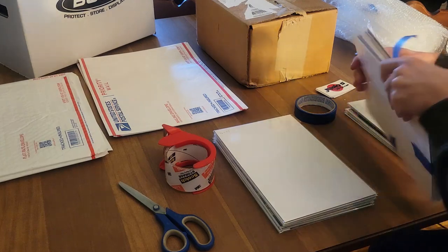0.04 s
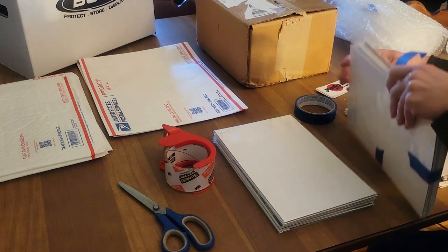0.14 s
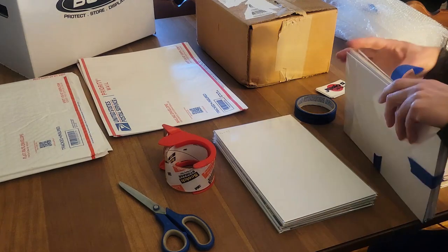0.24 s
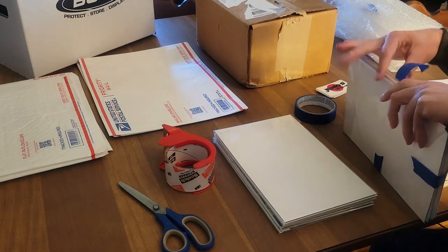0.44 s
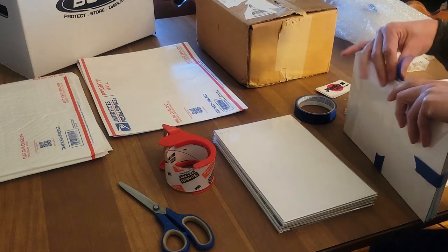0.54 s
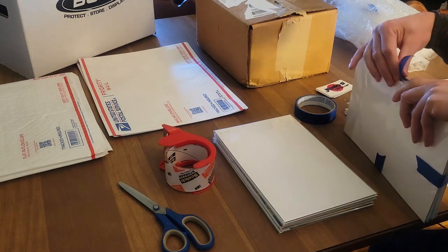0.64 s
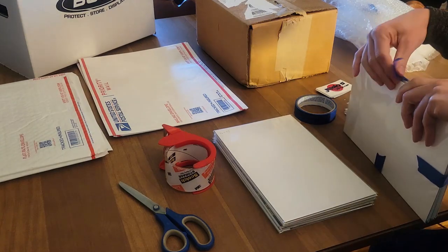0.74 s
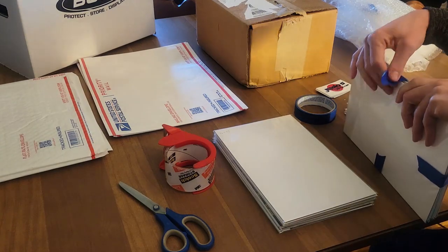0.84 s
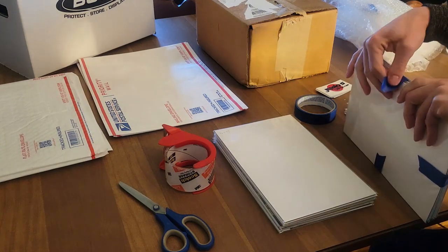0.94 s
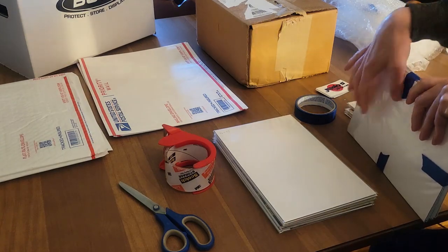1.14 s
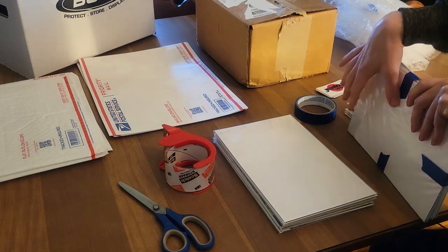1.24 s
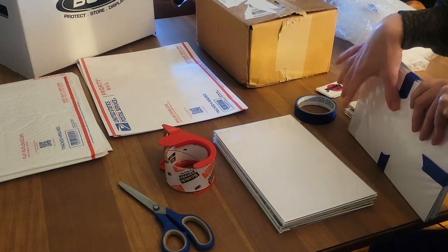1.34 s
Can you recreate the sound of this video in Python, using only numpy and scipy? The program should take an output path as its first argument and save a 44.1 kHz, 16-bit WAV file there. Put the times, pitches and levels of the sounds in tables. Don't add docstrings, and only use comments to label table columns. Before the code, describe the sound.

A stack of taped card is knocked edge-down on a wooden table: papery snap, woody boom, a light bounce. Then faint finger rubs, tiny tape ticks and a short palm drag, close stereo microphone, small live room.

```python
import sys
import numpy as np
from scipy import signal
from scipy.fft import rfft, irfft, next_fast_len
from scipy.io import wavfile
from scipy.ndimage import uniform_filter1d

SR = 44100
rng = np.random.default_rng(int(sys.argv[2]) if len(sys.argv) > 2 else 0)


def gain_from_decibels(decibels):
    exponent = np.asarray(decibels, float) / 20
    return 10 ** exponent


def persist_wave(psi):
    counts = np.round(np.clip(psi, -1, 1) * 32767).astype(np.int16)
    wavfile.write(sys.argv[1], SR, np.atleast_2d(counts).T)


N = 61739
SLAP_S = .2485


def evened(x):
    return x / np.sqrt(np.mean(x ** 2) + 1e-20)


def read(points, hz):
    f, value = np.transpose(points)
    return np.interp(np.log(hz + 1), np.log(f + 1), value)


def colour(x, points, lag_s=0.):
    size = next_fast_len(x.shape[-1] + 4096)
    hz = np.fft.rfftfreq(size, 1 / SR)
    response = gain_from_decibels(read(points, hz)) * np.exp(-2j * np.pi * hz * lag_s)
    return irfft(rfft(x, size) * response, size)[..., :N]


def ring(start_s, hz, db, t60_s, rise_s):
    t = np.maximum(np.arange(N) / SR - start_s, 0)
    envelope = gain_from_decibels(db - 60 * t / t60_s) * (1 - np.exp(-t / rise_s))
    return envelope * np.sin(2 * np.pi * hz * t)


def heard(x, loose):
    # pitch_hz, level_db
    lean = [(60, 8), (300, -1), (1200, 2.5), (4000, 1.5), (8000, 10), (15000, 3)]
    half = np.array(lean) * [1, .5]
    left, right = x[0] * np.sqrt(1 - loose ** 2) + loose * x[1:]
    return np.array([colour(left, half, lag_s=0.0001404), colour(right, half * [1, -1])])


def slap():
    # start_s, level_db, bright pitch_hz
    contacts = [
        (.2442, -34, 3000),
        (.2463, -22, 2200),
        (.2477, -22, 4600),
        (.2484, -16, 5200),
        (.2502, -22, 4500),
        (.2514, -21, 5500),
        (.2528, -28, 6000),
    ]
    # pitch_hz, level_db per Hz
    paper_spectrum = [(470, -9), (800, -6), (2600, -11.5), (4160, -3.5), (6110, -10.5), (6670, -24.5),
                      (8550, -10.5), (15500, -17.5)]
    slap_db, rise_s, fall_s = -23, .0014, .0028
    air_db, air_rise_s = -15, .0054
    t = np.arange(N) / SR - SLAP_S
    puff = np.exp(np.where(t < 0, t / rise_s, -t / fall_s))
    puff = puff + gain_from_decibels(air_db) * (t < 0) * np.exp(np.minimum(t, 0) / air_rise_s)
    out = gain_from_decibels(slap_db) * puff * evened(colour(rng.standard_normal((3, N)), paper_spectrum))
    for start_s, db, hz in contacts:
        out += ring(start_s, hz, db, .0025, .00005)
        out += ring(start_s, 2.3 * hz, db - 4, .0012, .00003)
    return out


def tabletop():
    # start_s, force_db
    blows = [
        (.2455, 1.5),
        (0.2528, 2),
        (.2575, -23),
        (0.264, -2.5),
        (.3240, -3),
    ]
    # pitch_hz, level_db
    top_modes = [(88, -57), (110, -26), (134, -25.5), (190, -35.5), (281, -32.5), (328, -39.5), (400, -42),
                 (510, -36.5), (590, -36), (670, -34.5), (740, -34), (860, -38), (965, -37), (1150, -39.5)]
    # start_s, pitch_hz, level_db, t60_s
    bounce = [
        (.3245, 816, -24.5, 0.013),
        (.3245, 484, -27, 0.033),
        (.3245, 1300, -41, 0.026),
    ]
    rattle_db, rattle_per_s, rattle_end_s, rattle_fade_db_per_s = -9, 400, .385, -91
    ring_cycles, ring_max_s = 52, .2
    blow_s, force_db = np.transpose(blows)
    t = np.arange(N) / SR
    after = t - blow_s[0]
    rattle = (after > 0) * (t < rattle_end_s) * gain_from_decibels(rattle_db + rattle_fade_db_per_s * after)
    rattle = rattle * (rng.random(N) < rattle_per_s / SR)
    out = sum(ring(start_s, hz, db, t60_s, .0003) for start_s, hz, db, t60_s in bounce)
    for hz, db in top_modes:
        push = rattle * rng.standard_normal(N)
        sign = rng.choice([-1, 1], len(blows))
        sign[-1] = 1
        push[np.round(blow_s * SR).astype(int)] = gain_from_decibels(force_db) * sign
        mode = ring(0, hz, db, min(ring_cycles / hz, ring_max_s), (24 / hz) ** 2)
        out += signal.fftconvolve(push, mode[:SR // 2])[:N]
    return out


def frame_sway():
    # pitch_hz, level_db, swell_s
    sway_modes = [
        (52, 0, .044),
        (104, -12, .045),
        (134, -13, .045),
        (39, -15, .13),
    ]
    sway_start_s = [
        .2475,
        .3262,
    ]
    sway_level_db = [
        -23.5,
        -27,
    ]
    sway_pace = [
        1,
        .85,
    ]
    out = np.zeros(N)
    for start_s, sway_db, pace in zip(sway_start_s, sway_level_db, sway_pace):
        since = np.arange(N) / SR - start_s
        for hz, db, swell_s in sway_modes:
            u = np.maximum(since, 0) / (swell_s * pace)
            swell = (u * np.exp(1 - u)) ** 5
            out += gain_from_decibels(sway_db + db) * swell * np.sin(2 * np.pi * hz * since)
    return out


def rub(stroke, body, per_s, spread_db, flutter_db):
    t, level_db = np.arange(N) / SR, np.transpose(stroke)
    strength = gain_from_decibels(spread_db * np.minimum(rng.exponential(1, (3, N)), 5))
    strength = strength * (rng.random((3, N)) < per_s / SR)
    grain = strength * rng.standard_normal((3, N))
    hiss = 0.64 * rng.standard_normal((3, N))
    slips = evened(colour(grain + hiss, body))
    flutter = evened(uniform_filter1d(rng.standard_normal(N), size=400))
    return slips * gain_from_decibels(np.interp(t, *level_db, left=-110) + flutter_db * flutter)


def finger():
    # start_s, level_db
    finger_stroke = [(0, -70), (.05, -82), (.128, -65), (.21, -76), (.40, -60.5), (.50, -78), (.585, -65),
                     (.63, -53), (.72, -73), (.765, -69), (.83, -73), (.88, -68), (1.0, -81.5),
                     (1.052, -68.5), (1.058, -62), (1.09, -54.5), (1.14, -57.5), (1.4, -73)]
    # pitch_hz, level_db per Hz
    skin_spectrum = [(500, -21), (1500, -6), (2700, -8.5), (3600, -1), (5200, -5), (7000, -6),
                     (12500, -3.5), (15800, -10)]
    return rub(finger_stroke, skin_spectrum, per_s=2000, spread_db=1.0, flutter_db=1.7)


def palm():
    # start_s, level_db
    palm_stroke = [(1.05, -89), (1.12, -75), (1.17, -53.5), (1.215, -47), (1.229, -46), (1.245, -49),
                   (1.28, -58.5), (1.33, -63), (1.4, -85)]
    # pitch_hz, level_db per Hz
    card_spectrum = [(200, -25), (430, -1.5), (700, -4.5), (1500, 3.5), (2400, -2.5), (4500, -6),
                     (11800, -15), (15800, -17)]
    return rub(palm_stroke, card_spectrum, per_s=2500, spread_db=3., flutter_db=1.2)


def drag():
    # start_s, level_db
    drag_stroke = [(1.09, -95), (1.115, -61.5), (1.16, -62), (1.23, -58.5), (1.30, -64.5), (1.36, -87),
                   (1.4, -82)]
    # pitch_hz, level_db per Hz
    woody_spectrum = [(150, -28), (300, -3.5), (450, 1), (800, -8.5), (1300, -9), (4000, -48)]
    return rub(drag_stroke, woody_spectrum, per_s=1200, spread_db=3.9, flutter_db=1.5)


def ticks():
    # start_s, peak level_db, pitch_hz, pan_db (left positive)
    tape_ticks = [
        (0.1246, -82, 3680, 3),
        (0.5567, -49.5, 4370, 13),
        (0.6854, -45.5, 5470, 3.5),
        (0.7454, -94, 2040, -5),
        (0.7669, -45, 5200, 22),
        (0.8678, -50.5, 4900, -5),
        (1.0548, -41, 9080, 19),
        (1.2281, -30, 2780, -22.5),
        (1.3111, -42, 2380, -8),
        (1.331, -43.5, 2800, 5),
    ]
    out, t = np.zeros((2, N)), np.arange(N) / SR
    fizz = evened(signal.lfilter([1, -.2], [1, -.3], rng.standard_normal(N)))
    for start_s, db, hz, pan_db in tape_ticks:
        since = np.maximum(t - start_s, 0)
        tick = ring(start_s, hz, db - 5, .003, .0001)
        tick = tick + gain_from_decibels(db - 10) * (t > start_s) * np.exp(-since / .0012) * fizz
        out += tick * gain_from_decibels(np.array([[pan_db], [-pan_db]]) / 4)
    return out


def room(x):
    # pitch_hz, t60_s
    room_decay = [(120, 0.47), (320, 0.33), (840, 0.37), (2200, 0.41), (3500, 0.36), (5800, 0.32),
                  (14000, 0.28)]
    # pitch_hz, level_db
    room_tilt = [(100, -3.5), (400, 8.5), (1200, 0), (2400, -5), (3600, -2), (7000, -13.5), (15000, -16.5)]
    # pitch_hz, level_db
    room_spread = [(150, 2.5), (400, -11.5), (900, 2.5), (3000, -0.5)]
    start_s, early_db, early_s = .003, 7.5, .011
    taps = np.zeros((2, SR))
    slots = np.arange(round(start_s * SR), SR - 20, 10)[None] + rng.integers(0, 10, (2, 1))
    at = slots + rng.integers(0, 10, slots.shape)
    np.put_along_axis(taps, at, rng.choice([-1., 1.], slots.shape), 1)
    hz, t, z = signal.stft(taps, SR, nperseg=256)
    decay_db = -60 * t / read(room_decay, hz)[:, None] + early_db * np.exp(-t / early_s)
    tail = signal.istft(z * gain_from_decibels(decay_db), SR, nperseg=256)[1][:, :SR]
    tail = tail * (np.arange(SR) > start_s * SR)
    tail = tail / np.linalg.norm(tail[0])
    mid, side = colour(signal.fftconvolve(x[None], tail, axes=1)[:, :N], room_tilt)
    return mid, colour(side, room_spread)


def hush():
    # pitch_hz, level_db per Hz
    hush_spectrum = [(25, -3), (130, -11), (180, -25.5), (430, -21.5), (640, -37), (1700, -36),
                     (4000, -41.5), (15800, -46)]
    # pitch_hz, correlation (-1 to 1)
    likeness = [(60, 0.65), (240, .95), (950, -0.61), (3770, -0.18), (15000, -0.59)]
    # pitch_hz, width_hz, level_db
    hum_lines = [
        (61.5, 8.3, -59),
        (122.15, 4.4, -63),
    ]
    hush_db = -55.5
    frames, hz = N // 512 + 6, np.fft.rfftfreq(2048, 1 / SR)
    a, b, c, d = rng.standard_normal((frames, 1025, 4)).T
    same = np.clip(read(likeness, hz), -1, 1)[:, None]
    left = a + 1j * b
    right = same * left + np.sqrt(1 - same ** 2) * (c + 1j * d)
    z = np.array([left, right]) * gain_from_decibels(read(hush_spectrum, hz))[:, None]
    out = gain_from_decibels(hush_db - 4) * evened(signal.istft(z, nperseg=2048, noverlap=1536)[1][:, :N])
    for hum_hz, width_hz, db in hum_lines:
        turn = np.exp(2j * np.pi * hum_hz * np.arange(N + SR) / SR)
        r = np.exp(-np.pi * width_hz / SR)
        waver = signal.lfilter([1 - r], [1, -r], rng.standard_normal(N + SR) / turn)
        out += gain_from_decibels(db) * evened((turn * waver).real[SR:])
    return out


def scene():
    snap_db, wood_in_room_db, ticks_in_room_db, room_db = 5.5, -13, 5.0, -0.5
    wood = tabletop() + frame_sway()
    small = ticks()
    near = heard(slap(), .45) + wood + heard(finger(), .98) + heard(palm(), .85) + heard(drag(), .45) + small
    snap = np.arange(N) == round(SLAP_S * SR)
    high_wood = signal.sosfilt(signal.butter(2, 150, "high", fs=SR, output="sos"), wood)
    sent = gain_from_decibels(snap_db) * snap + gain_from_decibels(wood_in_room_db) * high_wood + gain_from_decibels(ticks_in_room_db) * small.mean(0)
    mid, side = room(sent)
    return near + gain_from_decibels(room_db) * np.array([mid + side, mid - side]) + hush()


def top_cut(x):
    return signal.sosfilt(signal.butter(12, 16290, fs=SR, output="sos"), x)


def record(dry):
    mix = signal.oaconvolve(dry, signal.firwin(301, 15900, fs=SR)[None], "same")
    return top_cut(mix)


dry = scene()
out = record(dry)
persist_wave(out)
```